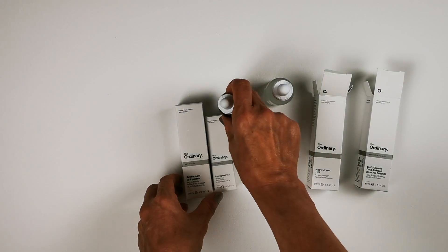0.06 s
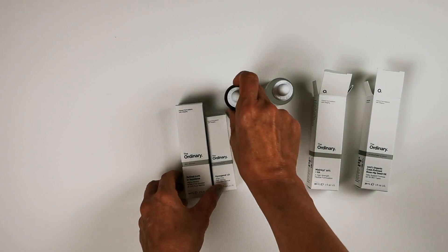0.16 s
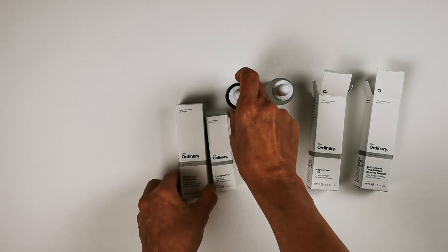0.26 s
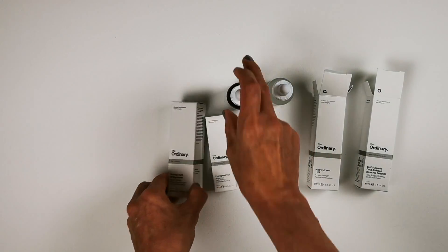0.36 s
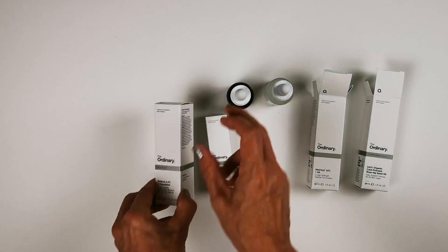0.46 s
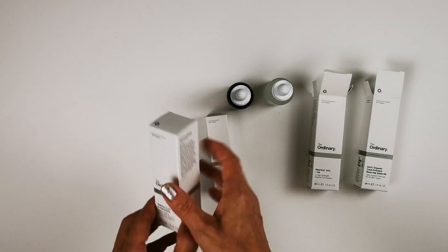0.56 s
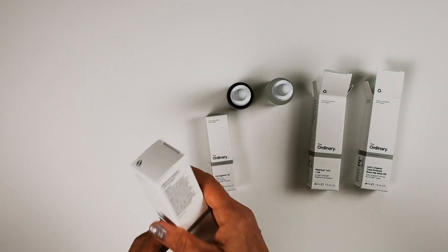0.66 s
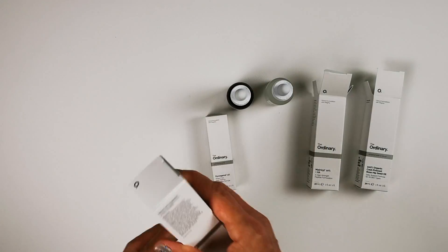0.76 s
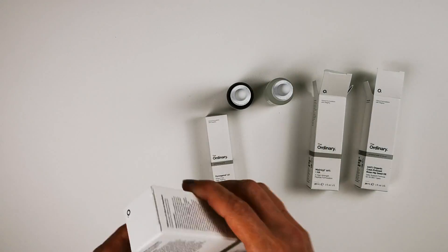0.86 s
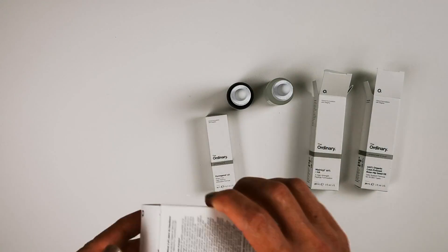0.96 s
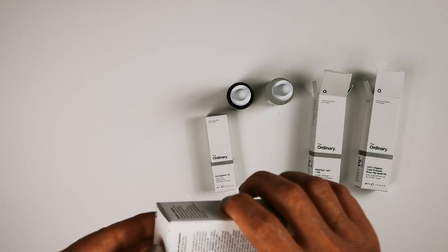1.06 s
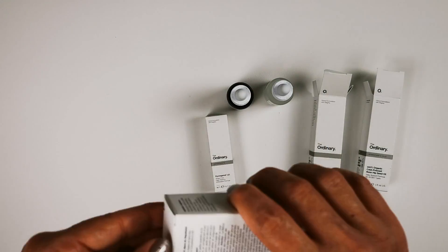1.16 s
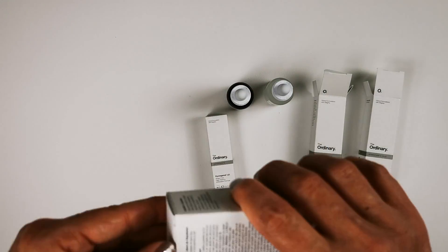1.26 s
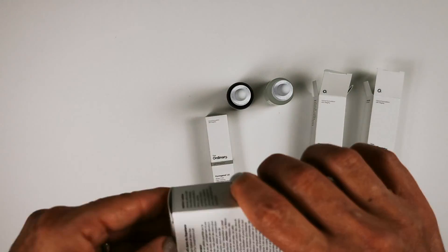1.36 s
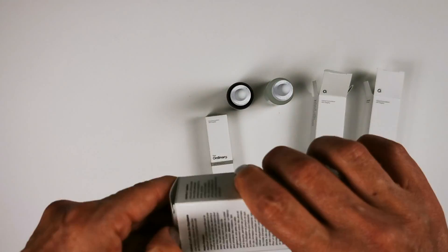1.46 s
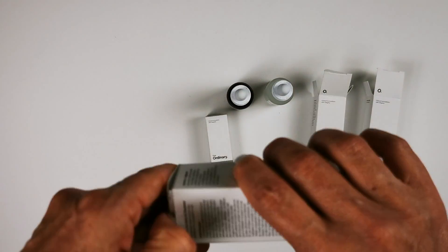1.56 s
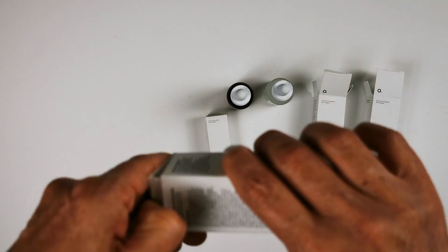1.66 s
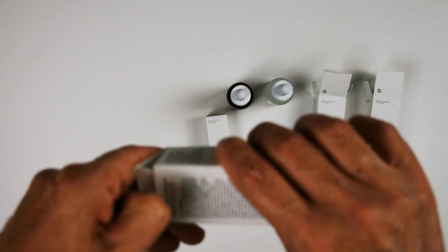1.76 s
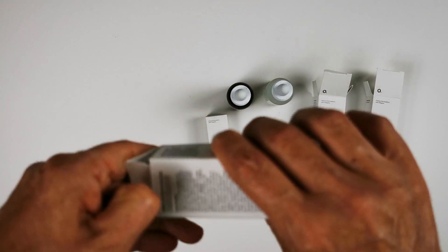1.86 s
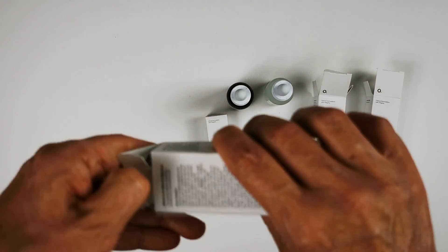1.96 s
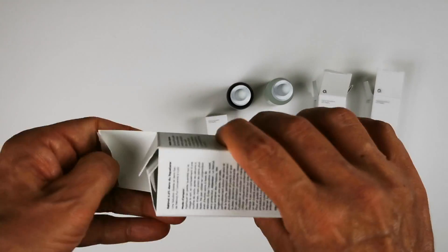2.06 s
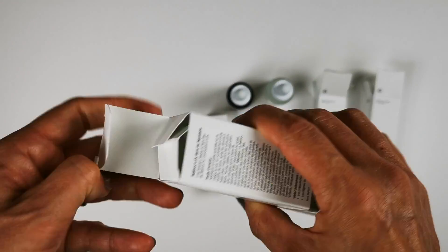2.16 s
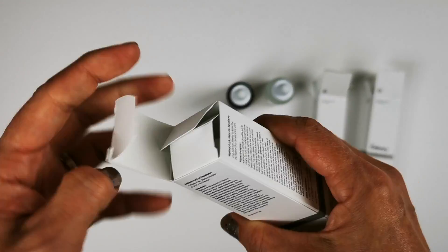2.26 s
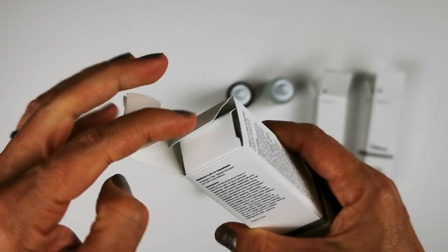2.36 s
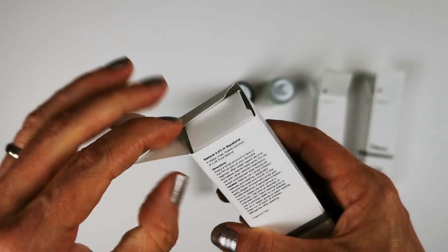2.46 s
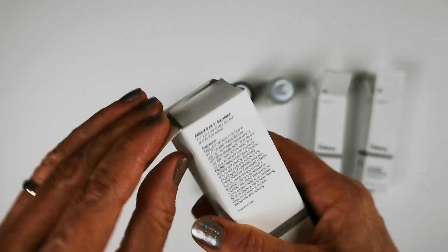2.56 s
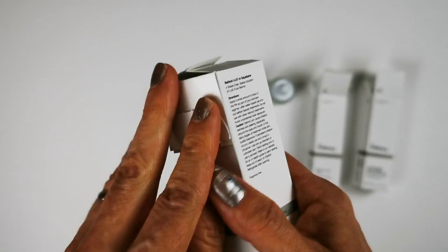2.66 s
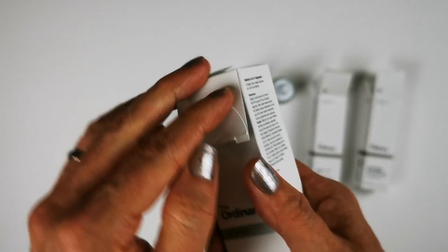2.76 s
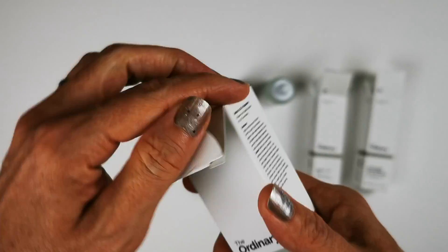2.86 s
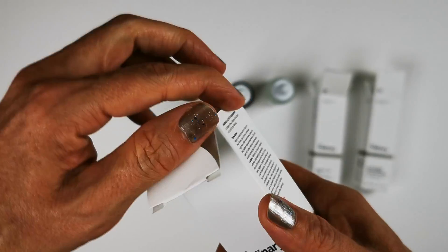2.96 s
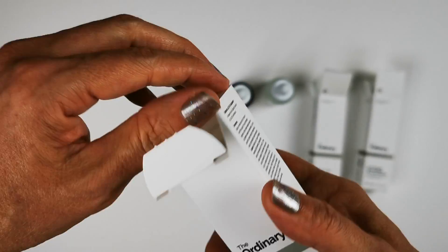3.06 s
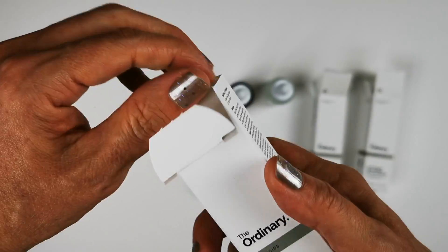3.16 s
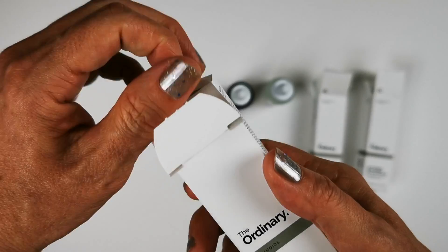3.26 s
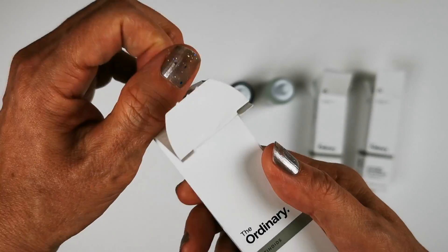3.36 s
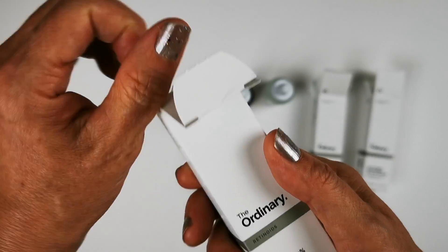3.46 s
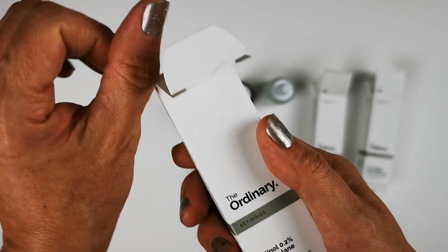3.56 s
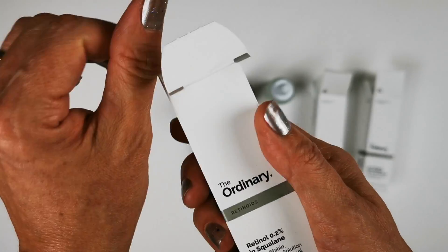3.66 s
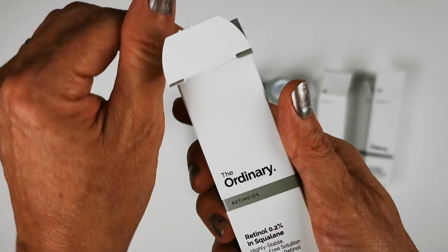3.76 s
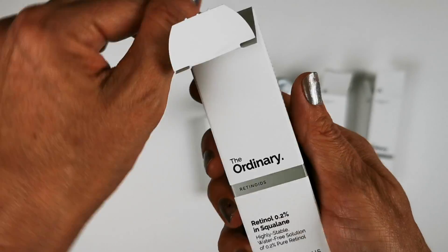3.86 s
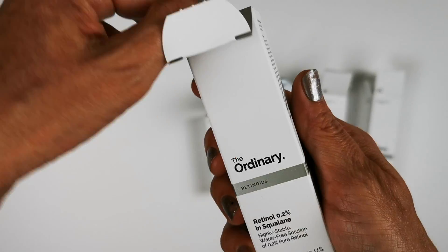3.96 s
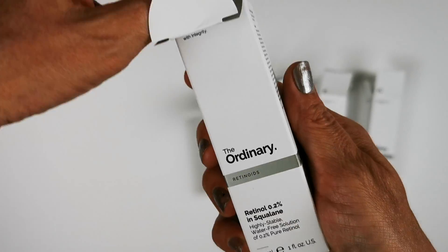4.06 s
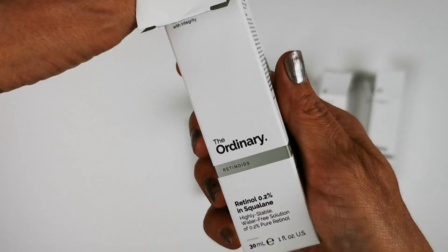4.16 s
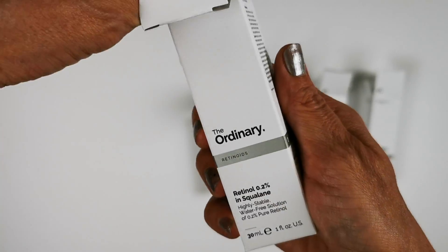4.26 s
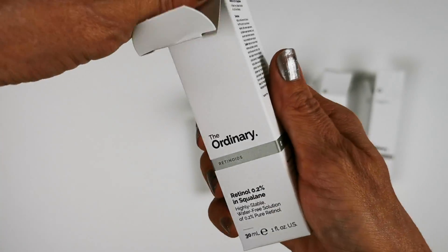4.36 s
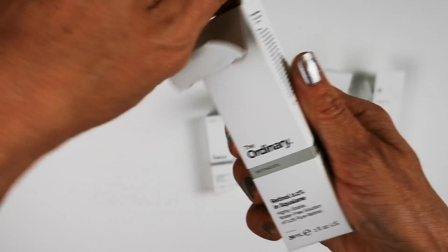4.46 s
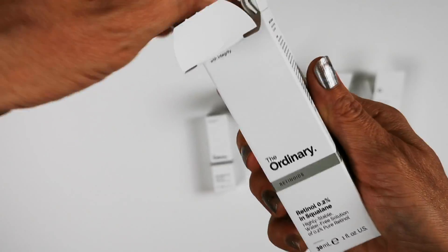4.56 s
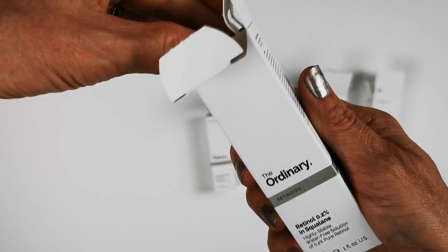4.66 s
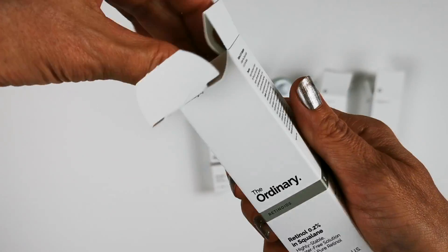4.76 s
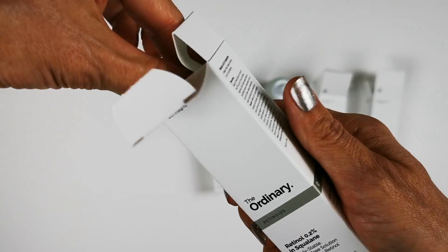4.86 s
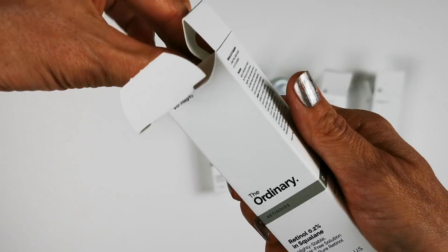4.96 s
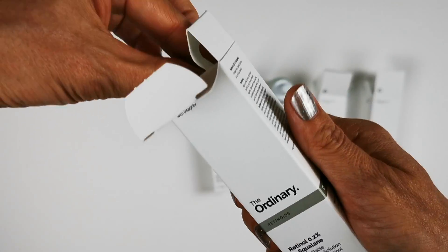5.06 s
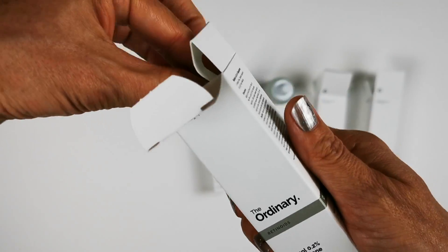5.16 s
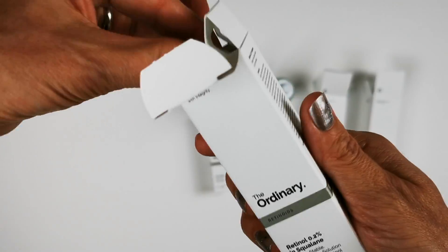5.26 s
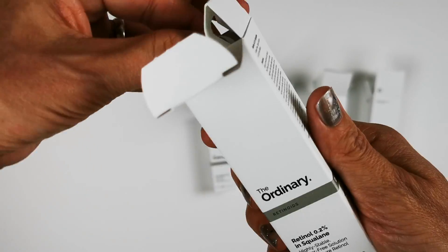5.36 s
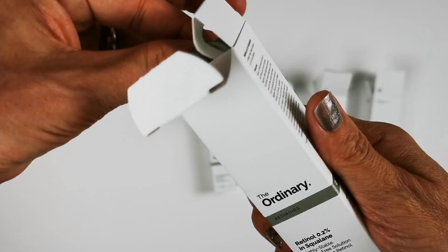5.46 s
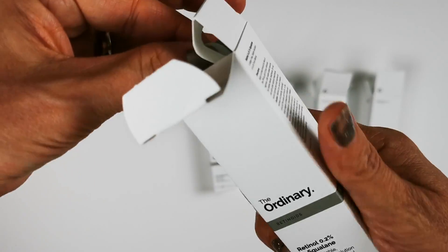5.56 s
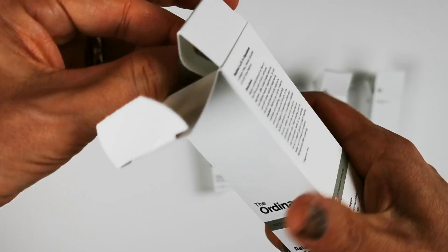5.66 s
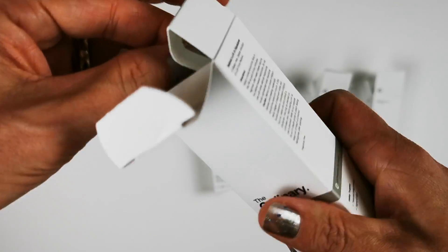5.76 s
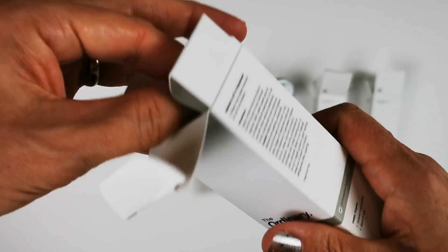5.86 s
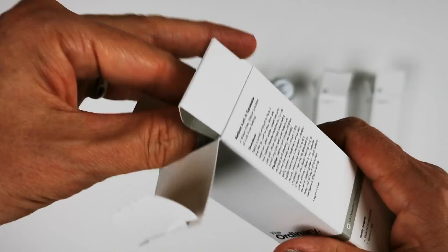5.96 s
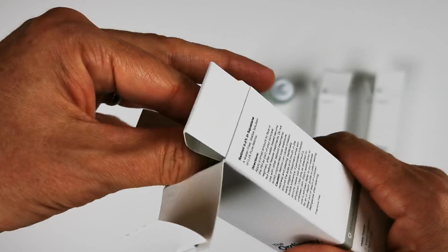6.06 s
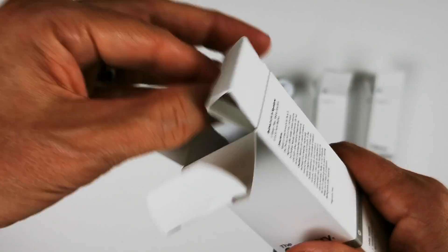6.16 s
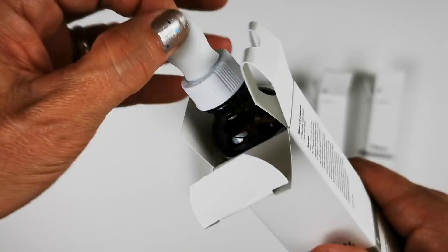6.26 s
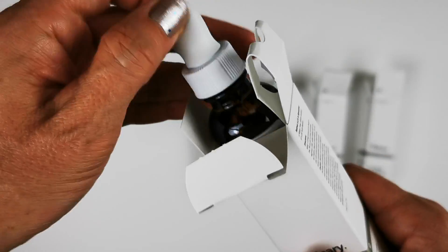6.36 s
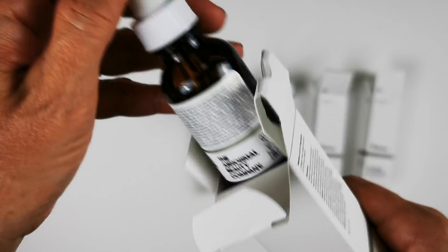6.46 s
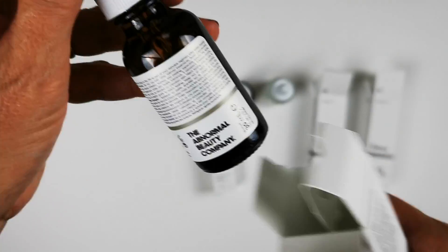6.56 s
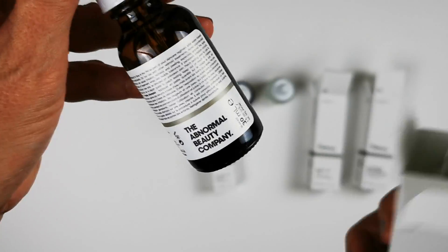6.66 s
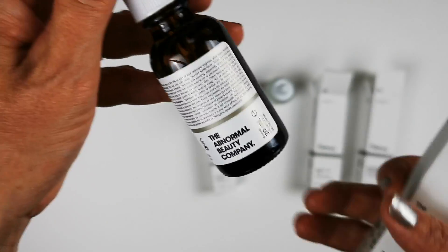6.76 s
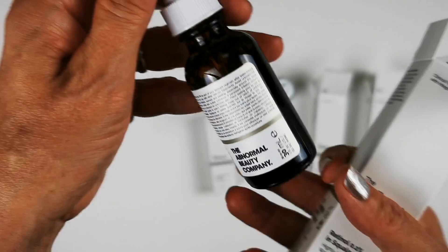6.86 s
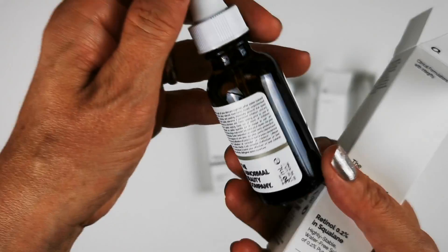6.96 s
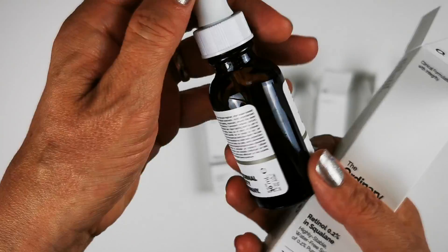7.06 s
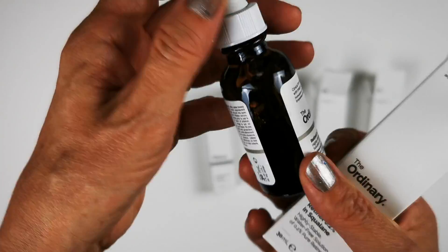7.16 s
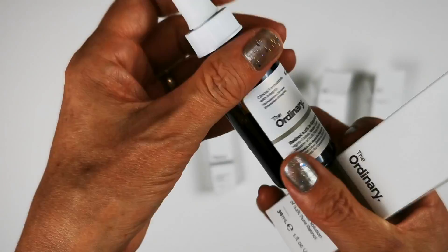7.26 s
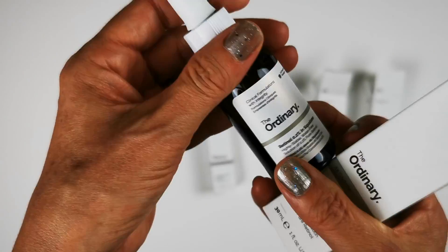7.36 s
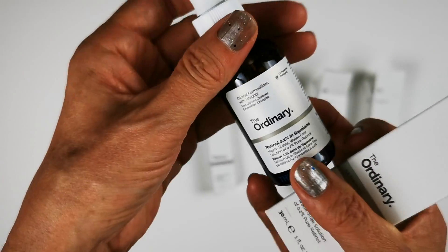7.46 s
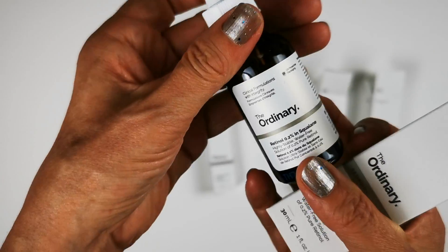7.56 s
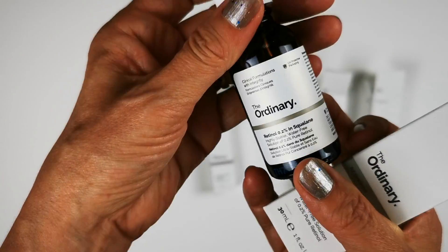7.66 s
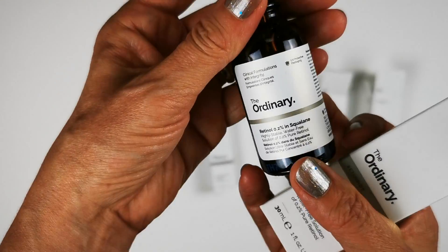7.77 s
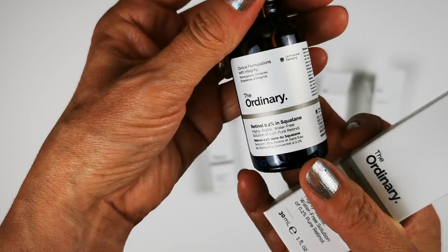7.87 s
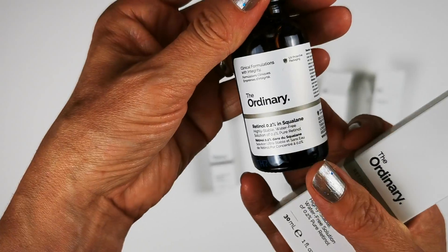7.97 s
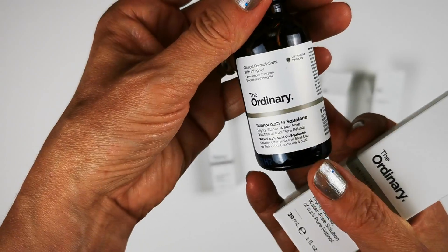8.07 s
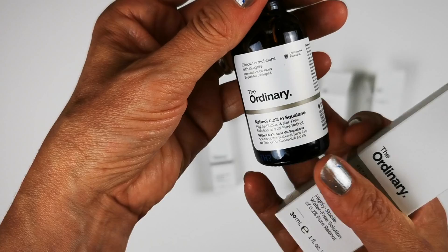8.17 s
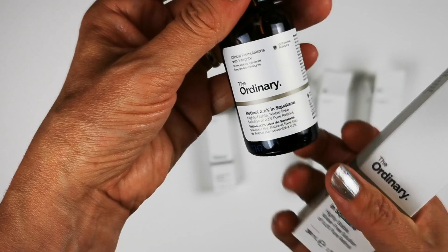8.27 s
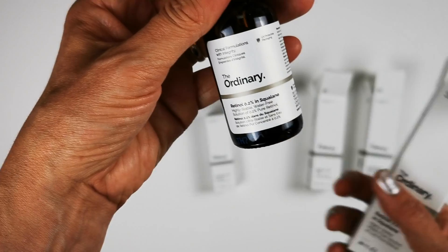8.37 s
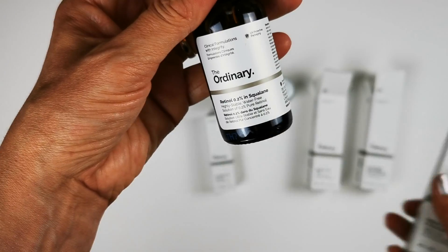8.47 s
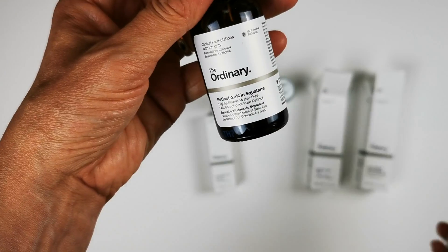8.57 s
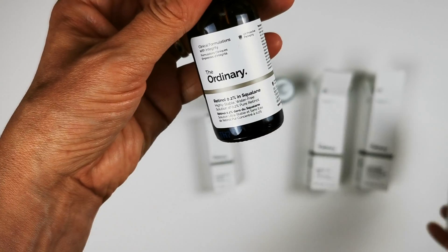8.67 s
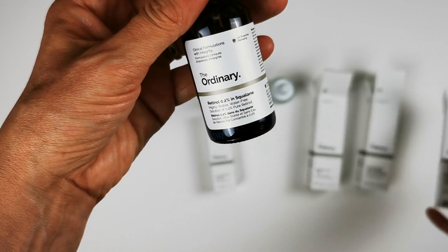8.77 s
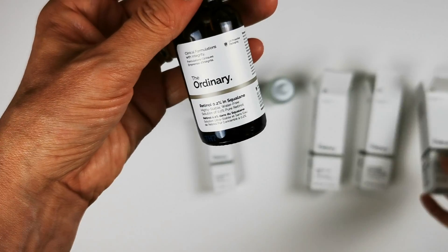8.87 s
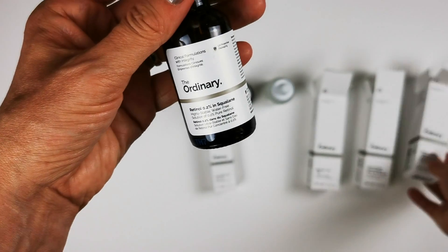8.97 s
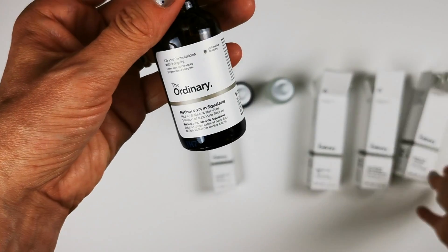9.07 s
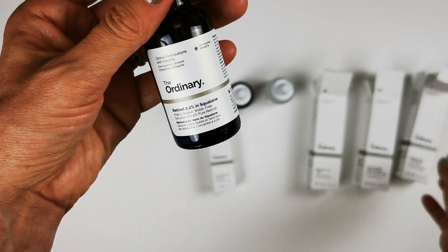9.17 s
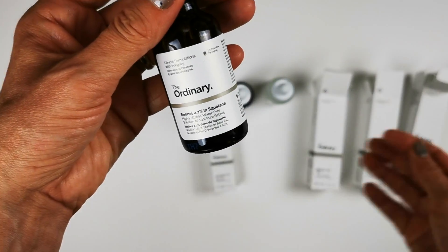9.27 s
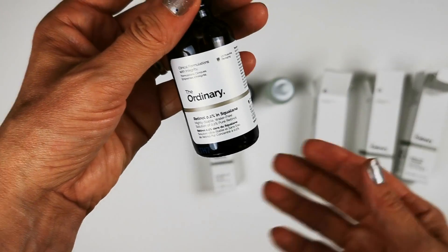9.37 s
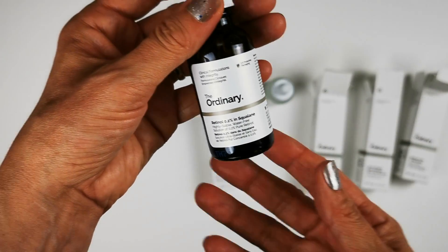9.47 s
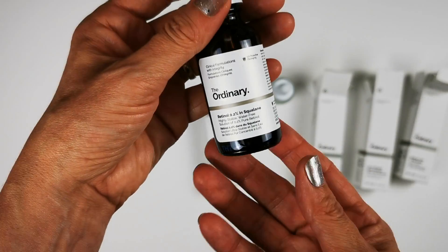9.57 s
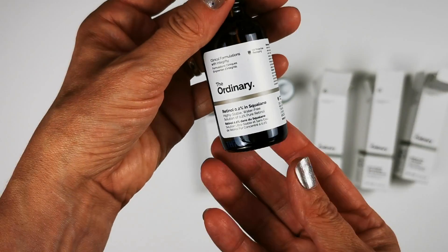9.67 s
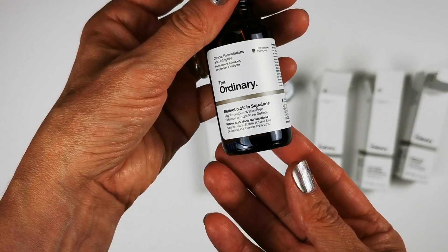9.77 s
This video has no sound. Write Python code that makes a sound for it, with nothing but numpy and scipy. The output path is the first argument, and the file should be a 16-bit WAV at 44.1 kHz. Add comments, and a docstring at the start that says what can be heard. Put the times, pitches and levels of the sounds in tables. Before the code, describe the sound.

Hands open a small paperboard box near the microphone: light table knocks, crisp flap snaps, papery rubbing, a bottle sliding out, then the box laid down.

```python
"""At a table in a small dry room, a stereo microphone close to the hands: first glass and box knock on the table.
Then a thin paperboard carton is opened and a small glass bottle pulled out: fingers and flaps rub the board,
folds snap and nails tap it, with a busy, loud stretch around six seconds; slips set the walls ringing and hissing.
At about nine seconds the box is laid down, with loud board snaps and two last knocks on the table top.
Short room echoes follow the hands; a faint wavering hum and microphone hiss lie below throughout."""
import sys
import numpy as np
from scipy import signal
from scipy.fft import rfft, irfft, next_fast_len
from scipy.io import wavfile
from scipy.ndimage import map_coordinates

SR = 44100
rng = np.random.default_rng(int(sys.argv[2]) if len(sys.argv) > 2 else 0)


def inscribe(sig):
    """Save sig as 16-bit PCM at rate SR to the path in sys.argv[1].

    A 1-D sig is mono; a 2-D sig holds one channel per row.
    Samples are clipped to [-1, 1] before scaling.
    """
    pcm = np.round(np.clip(np.atleast_2d(sig).T, -1, 1) * 32767)
    wavfile.write(sys.argv[1], SR, pcm.astype(np.int16))


N = 432621

# resonances of carton walls and air, for rubs and snaps: f/Hz, width/Hz, level/dB
BOARD_MODES = [(575, 110, -8), (797, 270, 4), (883, 108, -1), (1078, 150, -2), (1210, 93, 0),
               (1400, 450, 4), (1600, 66, -5.5), (1830, 180, -3), (1947, 180, 2.5), (2257, 340, 7),
               (2570, 150, -2.5), (2870, 310, -2.5)]
# spectrum of skin hiss and board cracks: f/Hz, level/dB [dB per Hz]
HISS_SPECTRUM = [(1470, -38), (2500, 1.5), (3440, -5.5), (4480, -4), (5500, -7.5), (6350, -6), (7300, -4),
                 (9730, -5.5), (12700, -5), (16000, -16)]
CRACKLE_PER_S, CRACKLE_SHARE = 90., .3  # coarse fibres giving way under a stroke


def rubbing():
    """Slips of skin and flap set the walls ringing; finer slips make the hiss."""
    board_gain, skin_gain, main_hz, hiss_hz = strokes()
    board = board_gain * (0.46 * rubbed_walls(main_hz) + 0.43 * singing_panel(main_hz)) * stutter(2.7)

    fibres = grains(CRACKLE_PER_S, 5.3)
    walls_crackle = crackle(fibres, main_hz)
    board = board + board_gain * 0.46 * walls_crackle * stutter(2.7)

    # each fibre lifts the hiss for a moment
    ticks = signal.lfilter([1], [1, -np.exp(-1 / (.0012 * SR))], np.abs(fibres))
    lift = .85 + CRACKLE_SHARE * rms_one(ticks)
    # skin catching on the coating
    squeak = gliding([grains(3000.0, 3.5) for part in "xy"], hiss_hz, width_hz=900.)
    skin = skin_gain * (skin_hiss(hiss_hz) + .7 * squeak) * stutter(1.8) * lift
    pan_db = hands(np.arange(N) / SR)[0]
    return (board + skin) * sides(pan_db)


def wall_grips(main_hz):
    """Gain of each wall mode around the sliding main ring, and the sum to level them by."""
    grips = [from_db(db + near_mode_db(hz, main_hz, fall_db=5.0)) for hz, width, db in BOARD_MODES]
    return grips, np.sqrt(sum(grip ** 2 for grip in grips))


def rubbed_walls(main_hz):
    """Dense small slips keep every wall mode ringing, each with its own shifting gain."""
    grips, total = wall_grips(main_hz)
    walls = 0
    for grip, (hz, width, db) in zip(grips, BOARD_MODES):
        walls = walls + grip * shifting() * rms_one(ring(grains(700., 3.1), hz, 0.9 * width))
    return walls / total


def crackle(fibres, main_hz):
    """One snapping fibre strikes all wall modes at once."""
    grips, total = wall_grips(main_hz)
    out = 0
    for k, (grip, (hz, width, db)) in enumerate(zip(grips, BOARD_MODES)):
        out = out + grip * rms_one(ring(fibres, hz, 4.5 * width)) * (-1) ** k
    return CRACKLE_SHARE * out / total


def singing_panel(main_hz):
    """The panel under the finger sings at a pitch that slides with the grip."""
    return gliding([grains(1600.0, 3.4) for part in "xy"], main_hz, width_hz=125.)


def skin_hiss(hiss_hz):
    """Fine slips in six bands, strongest near the sliding hiss peak, partly different in each capsule."""
    slips = coloured(np.array([grains(9000., 1.5) for part in range(3)]), HISS_SPECTRUM)
    hiss, total = 0, 0
    for k, low in enumerate(1400 * 1.5 ** np.arange(6)):
        high = 1.5 * low + 1500 * (k == 5)
        sos = signal.butter(2, [low, high], "band", fs=SR, output="sos")
        # alternate signs make neighbouring bands add where they meet
        gain = from_db(near_mode_db(1.198 * low, hiss_hz, fall_db=10.0)) * (-1) ** k
        shared, *own = signal.sosfilt(sos, slips)
        wide = shared + .7 * np.array(own)  # a wide contact differs in each capsule
        hiss = hiss + gain * np.sqrt(shifting()) * stutter(1.1) * wide
        total = total + gain ** 2 * np.mean(shared ** 2)
    return hiss / np.sqrt(total)


def stutter(depth_db):
    """Stick and let go: a level that wavers at random, depth as rms dB."""
    return from_db(depth_db * rms_one(ring(rng.standard_normal(N), 5.4, 42.0)))


GRIP_SHIFT_DB = 4  # rms shift; the hiss bands take half of it


def shifting():
    """A slow random gain: the grip damps now one wall mode, now another."""
    knots = np.arange(0, N + 2000, 2000)
    return from_db(np.interp(np.arange(N), knots, GRIP_SHIFT_DB * rng.standard_normal(len(knots))))


# strokes of finger or flap on the board: t/s of firmest contact, swell by 20 dB/ms, fade by 20 dB/ms,
#   board ring level/dB, skin hiss level/dB, main ring f/Hz, hiss peak f/Hz
RUB_STROKES = [ (0.09, 212, 80.5, -58.5, -82, 837, 4800), (0.225, 30.5, 251, -63, -86.5, 826, 5540),
               (0.392, 25.5, 40, -55, -72, 1263, 6140), (0.415, 62, 79, -72.5, -65.5, 1263, 4930),
               (0.695, 149.5, 32, -64, -75, 863, 6370), (0.712, 12, 38.5, -57.5, -54.5, 1307, 5250),
               (0.761, 42, 398.5, -68, -66.5, 1290, 5687), (1.033, 40, 40, -63.5, -69, 910, 4970),
               (1.105, 70, 45, -59, -59.5, 1274, 5320), (1.191, 199.5, 70.5, -70, -70, 1600, 5320),
               (1.267, 39.5, 30, -54, -65.5, 1181, 4880), (1.452, 300.5, 501.5, -73.5, -83.5, 1400, 6950),
               (1.657, 10.5, 60, -66, -76, 936, 4930), (1.738, 21.5, 80, -53, -52.5, 1727, 7540),
               (1.822, 30, 120.5, -50, -59, 892, 6230), (1.85, 72.5, 45, -50, -62, 1300, 6090),
               (1.97, 80, 150, -46, -56.5, 1450, 5906), (2.073, 25, 92.5, -44.5, -48, 1660, 5566),
               (2.139, 42.5, 132.5, -59.5, -64.5, 1670, 5454), (2.231, 35, 111, -52, -58.5, 1900, 6346),
               (2.42, 120, 349, -60.5, -80, 1294, 5040), (2.644, 200.5, 40, -63, -71.5, 1106, 5780),
               (2.685, 24.5, 118, -51, -56, 1410, 5784), (2.723, 90.5, 43.5, -50.5, -53, 1428, 7326),
               (2.81, 29.5, 201, -61.5, -73.5, 1496, 5790), (2.892, 100, 122, -56.5, -55, 1356, 8225),
               (2.959, 101.5, 90, -63, -60, 1284, 7560), (3.04, 149, 200.5, -69, -73, 1187, 7020),
               (3.112, 26.5, 150, -60, -67, 1193, 6915), (3.139, 18.5, 24, -67.5, -54, 1285, 6953),
               (3.255, 40, 200, -67.5, -69.5, 1488, 4600), (3.312, 46.5, 97.5, -58.5, -59.5, 1813, 6800),
               (3.347, 60, 120, -53, -59.5, 1503, 5163), (3.45, 39, 71, -60, -80, 1400, 5530),
               (3.58, 200, 80, -68, -78.5, 1400, 5185), (3.72, 171, 59, -61, -63, 1750, 6050),
               (3.771, 43.5, 85, -47.5, -54.5, 1810, 7465), (3.944, 119, 299, -56.5, -61, 1182, 7220),
               (4.083, 79, 43.5, -60, -60, 1198, 5887), (4.168, 50, 60, -56, -63.5, 1712, 6300),
               (4.205, 40.5, 60, -62.5, -59, 1492, 6370), (4.304, 19.5, 251, -56, -65.5, 1238, 6310),
               (4.46, 302.5, 198.5, -64, -61, 1160, 6780), (4.565, 130.5, 45.5, -49.5, -50, 1643, 7926),
               (4.63, 26.5, 39.5, -46, -58, 1532, 7250), (4.71, 119, 60.5, -50.5, -56.5, 1284, 6250),
               (4.83, 303, 303, -56, -63, 1520, 6440), (4.9, 99.5, 60.5, -53.5, -60.5, 1575, 5300),
               (5.035, 149.5, 130.5, -72, -86, 1332, 4794), (5.268, 42.5, 120, -50, -55, 2950, 6520),
               (5.298, 61.5, 60, -47, -55, 1570, 5875), (5.359, 93, 102, -65, -67.5, 1600, 6420),
               (5.42, 53.5, 69.5, -63.5, -75, 1716, 6540), (5.47, 60, 80, -67.5, -75, 1900, 4500),
               (5.53, 30, 60.5, -60, -72, 1300, 4200), (5.555, 60, 36, -60.5, -66, 1505, 7128),
               (5.589, 25, 50, -60.5, -70, 1700, 4500), (5.63, 51, 98, -61, -66, 1807, 6496),
               (5.71, 148.5, 130.5, -59, -61, 1900, 5964), (5.816, 35.5, 92, -53, -52.5, 1872, 6950),
               (5.87, 25.5, 23.5, -35.5, -41.5, 1756, 5313), (5.905, 22, 200, -48.5, -60.5, 1903, 5097),
               (6.08, 251.5, 71, -62.5, -59, 1569, 4392), (6.212, 29.5, 73, -55, -52, 1400, 5660),
               (6.24, 22, 51, -32, -34.5, 1936, 5860), (6.291, 50, 100, -50.5, -45.5, 1306, 6350),
               (6.334, 99, 44, -49.5, -50.5, 1144, 6566), (6.399, 23, 198.5, -67, -71.5, 1190, 6460),
               (6.475, 46.5, 171.5, -54.5, -45.5, 1146, 7710), (6.505, 15.5, 89.5, -45, -52.5, 1120, 6475),
               (6.565, 39, 108.5, -41.5, -47, 1165, 6420), (6.62, 124, 112.5, -52.5, -61.5, 1196, 6063),
               (6.7, 104, 36.5, -58, -61.5, 1222, 5450), (6.82, 59, 201, -72, -83, 1260, 5650),
               (7.2, 296.5, 200, -83, -83.5, 1164, 7600), (7.296, 32.5, 59.5, -66.5, -79, 1140, 6970),
               (7.417, 103, 69, -70.5, -85, 1227, 7235), (8.309, 201.5, 198, -73, -90, 1210, 6424),
               (8.404, 68.5, 202.5, -63.5, -68, 1380, 5960), (8.482, 26, 71, -59.5, -69, 1130, 6720),
               (8.635, 40.5, 297.5, -65, -67, 1103, 7290), (8.708, 208, 141.5, -65, -63, 1104, 7595),
               (8.97, 134, 28, -69.5, -69, 1652, 7360), (9.018, 24, 89.5, -40, -52, 1210, 4630),
               (9.125, 30.5, 83, -35, -52.5, 891, 5500), (9.2, 52.5, 117.5, -58.5, -80.5, 938, 6000)]
STROKE_ROUNDNESS = 0.95  # exponent: 1 = even slope in dB, more = fuller top and more sudden ends


def strokes():
    """Each stroke swells to its firmest contact and fades; the loudest weighs most in the pitch of ring and hiss."""
    s, swell, fade, board_db, skin_db, main_hz, hiss_hz = np.transpose(RUB_STROKES)[:, :, None]
    t = np.arange(0, N + 64, 32) / SR
    swell, fade = swell / 1000, fade / 1000  # ms to s
    before, after = (s - t) / np.maximum(swell, 1e-3), (t - s) / np.maximum(fade, 1e-3)
    shape_db = -20 * np.maximum(before, after) ** STROKE_ROUNDNESS
    # powers of all strokes
    board, skin = [from_db(2 * (db + shape_db)) + 1e-30 for db in (board_db, skin_db)]
    ring_hz = (board * main_hz).sum(0) / board.sum(0)
    peak_hz = (skin * hiss_hz).sum(0) / skin.sum(0)
    controls = [np.sqrt(board.sum(0)), np.sqrt(skin.sum(0)), ring_hz, peak_hz]
    return [np.interp(np.arange(N) / SR, t, c) for c in controls]


# where the hands are before the microphone: t/s, left-right level/dB, lag of left/samples
HAND_PLACES = [(0, -4.5, -3), (1.5, -4, -1.5), (2.4, -5, -2.5), (3.799, -4, -2), (5.8, -4, -2),
               (7.8, -4, -5), (8.1, 9, -7), (8.4, -10, 4.5), (9.3, -3.5, 10.5), (9.8, -2, 5)]


def hands(t):
    """Balance and lag of the hands at the given times."""
    s, pan_db, lag = np.transpose(HAND_PLACES)
    return np.interp(t, s, pan_db), np.interp(t, s, lag)


# snaps and taps on the board: t/s, level/dB, main ring f/Hz, crack over snap level/dB,
#   hollow knock over snap level/dB, focus on the main ring/dB per octave
BOARD_SNAPS = [(0.704, -45, 1050, -9.5, 3.5, 5), (1.028, -40.5, 793, -14, -19, 9.5),
               (1.106, -37.5, 1433, -13, -16, 19), (1.255, -40, 720, -24, -7, 21),
               (1.259, -37, 1430, -22, -45, 15), (1.656, -48, 846, -12.5, -26, 15.5),
               (1.701, -49, 1290, -13.5, -9, 21.5), (1.717, -19, 1400, -2, -10.5, 3.5),
               (1.804, -39, 792, -7, -36, 14.5), (1.952, -46.5, 1270, -35, -30, 27.5),
               (1.963, -30.5, 1186, -29.5, -46, 31), (2.042, -35, 1787, 3, -18, 4.5),
               (2.052, -11.5, 1600, -2, -19, 24), (2.058, -19.5, 1684, -23, -8.5, 2.5),
               (2.231, -36.5, 1830, 11.5, -7, 6), (2.32, -41, 2340, -4, -25, 16),
               (2.444, -54, 1900, -2, -30, 8), (2.584, -42, 1210, -6, -22, 12.0),
               (2.63, -45.5, 937, 2, -20, 18), (2.674, -47.5, 968, 9, -28, -5),
               (2.726, -50, 1394, 6, -1, 22.5), (2.799, -50.5, 1600, 8, -22, 20),
               (3.107, -62, 1201, 6, -21, 20), (3.138, -48, 1167, 15, -21, 27),
               (3.316, -56, 1998, -1, -30, 8), (3.345, -59, 1500, -3, -28, 8),
               (3.77, -36, 1486, -17, -20, 8), (3.982, -45.5, 1298, -2, -22, 4),
               (4.06, -46, 2000, -3, -30, 6), (3.75, -40.5, 1810, 0, -26, 3.5),
               (4.089, -40.5, 894, -13, -20, 4.5), (4.166, -31.5, 1334, -10, -29, 13),
               (4.294, -41, 1210, -20, -41.5, 34), (4.373, -37.5, 982, -25.5, -30.5, 18.5),
               (4.475, -44, 800, -10, -30, 12), (4.536, -38, 600, -18, -3, 18),
               (4.572, -39, 2300, 0, -30, 14), (4.619, -41, 2800, -2, -30, 20),
               (4.63, -34, 1500, -6, -20, 8), (4.688, -41, 1220, -10, -20, 12.0),
               (4.717, -30, 760, -6, -18, 6), (4.873, -42, 1570, -11, -20, 25),
               (4.898, -35, 1550, -10, -20, 10), (5.241, -55, 2015, -14, -33, 12),
               (5.265, -42, 3007, -6, -31, 22), (5.276, -37.5, 1700, -18.5, -35, 12),
               (5.287, -41, 1463, -14, -25, 6), (5.301, -34, 1503, -11, -30, 19),
               (5.32, -28.5, 1570, -5, -44, 25), (5.359, -43.5, 1210, 6.5, -32, 29),
               (5.387, -46, 1490, 0, -32, 20), (5.409, -45.5, 3000, -10, -29, 4),
               (5.552, -52, 1500, 4, -30, 18), (5.624, -52, 1780, -6, -28, 6),
               (5.793, -44, 2000, -26, -24, 5), (5.814, -40, 1892, 4, -30, 15),
               (5.856, -31, 1395, 1, -9.5, 14), (5.868, -28.5, 1170, -24, -43, 13),
               (5.894, -21.5, 1970, -22, -17, 19.5), (5.924, -48, 2364, 6, -40, 20),
               (5.98, -56, 895, -18.5, 9.5, 21), (6.071, -49.5, 1800, -0.5, 3.5, -3),
               (6.211, -47, 1900, 11, -30, 13), (6.233, -18, 1960, -40, -40, 21),
               (6.247, -25.5, 1600, -10.5, -28, 26), (6.243, -19.5, 2120, -15, -28, 29.5),
               (6.285, -31.5, 2690, 13, -8.5, -7.5), (6.289, -23.5, 910, -5, -3, 63),
               (6.398, -43, 1210, -25, -41.5, 13), (6.455, -44, 2600, 7, -30, 13),
               (6.493, -28, 1105, -23, -40, 37), (6.558, -26.5, 1078, -18.5, -7.5, 19),
               (6.564, -20.5, 1210, -36, -14, 11), (6.578, -27, 1150, -24, -4, 26),
               (6.585, -39, 1130, -20.5, -12.5, 12), (6.605, -30, 1160, 3.5, -17, 23),
               (6.632, -27, 1160, -12, -20, 20), (6.888, -38, 1208, -23, -13.5, 15),
               (6.933, -35.5, 1153, -31, -23, 35), (7.103, -36, 1140, -22, -14.5, 28),
               (7.3, -45.5, 1184, -25.5, -25, 36), (7.409, -48, 1240, -31, -28, 29),
               (7.456, -46.5, 1148, -18.5, -18, 7), (7.465, -35, 1120, -19.5, -22, 12.5),
               (8.254, -54, 1196, -21, -40, 31), (8.302, -38.5, 1210, -25.5, -39, 31),
               (8.483, -38, 1052, -25, -12.5, 37), (8.989, -21.5, 891.6, -12.5, -8.5, 1.5),
               (9.003, -29.5, 1000, -1, -5.5, -5), (9.108, -15.5, 796, -6.5, -6.5, 2.5)]
# low resonances of the hollow box: f/Hz, width/Hz, level/dB
HOLLOW_MODES = [(190, 70, -12), (318, 70, -2), (450, 90, -4), (570, 80, -3)]
SNAP_S = 0.00313  # time a fold takes to give way
SNAP_PAN_DB, SNAP_SCATTER_DB = -3.5, 2  # folds lie right of the fingers, a little apart from each other
CRACK_FOCUS = 1.1  # pitched part at the hiss peak, against the plain crack noise at 1
MODE_SCATTER_DB = 2  # each blow, on board or table, strikes the modes a little differently


def snaps():
    """A fold gives way in a few slips; they strike the wall modes, crack briefly and knock the hollow box."""
    s, peak_db, main_hz, crack_db, knock_db, focus_db = np.transpose(BOARD_SNAPS)
    chance = rng.standard_normal((len(s), len(BOARD_MODES) + len(HOLLOW_MODES) + 1))
    pan_db = hands(s)[0] + SNAP_PAN_DB + SNAP_SCATTER_DB * chance[:, len(BOARD_MODES)]
    height = from_db(peak_db) * sides(pan_db)

    late, size = rng.random((2, len(s), 5))
    late[:, 0], size[:, 0] = 0, 2.4  # the first slip leads
    at = (s[:, None] + late * SNAP_S).ravel()
    sign = rng.choice([-1, 1], size.shape)

    def slips(heights, factor):
        """The five slips of every snap as clicks."""
        return clicks(at, (heights[..., None] * size * factor).reshape(2, -1))

    out = 0
    for k, (hz, width, db) in enumerate(BOARD_MODES):
        focus = near_mode_db(hz, main_hz, fall_db=focus_db)
        strength = from_db(db - 14 + focus + MODE_SCATTER_DB * chance[:, k])
        out = out + ring(slips(height * strength, sign * (-1) ** k), hz, width)

    low_height = from_db(peak_db + knock_db) * sides(.5 * pan_db)  # long waves reach both capsules more alike
    for k, (hz, width, db) in enumerate(HOLLOW_MODES):
        strength = from_db(db - 5 + MODE_SCATTER_DB * chance[:, -1 - k]) * (-1) ** k
        out = out + ring(clicks(s, low_height * strength), hz, width)

    burst = slips(height * from_db(crack_db - 16.0), 0.46) + 1e-18
    return out + cracks(burst)


def cracks(burst):
    """Each slip lets out a burst of noise that dies first fast, then slower."""
    shared, *own = coloured(np.array([grains(12000.0, 0.72) for part in range(3)]), HISS_SPECTRUM)
    sharp, lasting = np.exp(-1 / (0.0021 * SR)), np.exp(-1 / (0.011 * SR))
    dying = signal.lfilter([1], [1, -sharp], burst) + 0.55 * signal.lfilter([1], [1, -lasting], burst)
    pitched = gliding([grains(13000.0, 0.8) for part in "xy"], strokes()[3], width_hz=1500.)
    noise = rms_one(shared + 1.2 * np.array(own))
    return dying * rms_one(noise + CRACK_FOCUS * pitched)


# bottle and box knocking on the table: t/s, level/dB, click over knock level/dB
TABLE_KNOCKS = [(0.014, -58, 21), (0.043, -29, -1), (0.064, -44, -15), (0.145, -49, -21), (0.194, -47, -52),
                (0.206, -39.5, -23), (0.215, -38.5, -30), (0.228, -53, -28), (0.244, -42.5, -28),
                (0.261, -72, -27), (0.3, -75, 2), (0.379, -30.5, -29.5), (0.415, -61, -25),
                (8.988, -54.5, 24), (9.11, -38.5, 6)]
# resonances of the table top: f/Hz, level/dB, t60/s
TABLE_MODES = [(120, 1, 0.14), (150, -4, .12), (192, 8, 0.04), (255.7, -7, 0.14), (317, -11, 0.18),
               (404, -7, 0.08), (507, -7, 0.06), (635, -8, 0.05), (855, -16, 0.05)]
THUMP_HZ, THUMP_WIDTH_HZ, THUMP_GAIN = 233, 51, 0.76  # first push of the top under a knock
ROCKING_DB, ROCKING_S = -30, 0.11  # the bottle rocks on after each knock: level, decay time constant


def knocks():
    """Each knock thumps the table top and ticks on its hard skin."""
    s, peak_db, click_db = np.transpose(TABLE_KNOCKS)
    chance = rng.standard_normal((len(s), len(TABLE_MODES)))
    after_knock = clicks(s, from_db(peak_db + ROCKING_DB))
    rocking = signal.lfilter([1], [1, -np.exp(-1 / (ROCKING_S * SR))], after_knock)
    rocking = rocking * grains(150., 0.89)
    out = 0
    for k, (hz, db, t60) in enumerate(TABLE_MODES):
        blow = clicks(s, from_db(peak_db - 8 + MODE_SCATTER_DB * chance[:, k]))
        width_hz = np.log(1000) / np.pi / t60
        out = out + ring(from_db(db) * (rocking - blow) * (-1) ** k, hz, width_hz)
    out = out - THUMP_GAIN * ring(clicks(s, from_db(peak_db)), THUMP_HZ, THUMP_WIDTH_HZ)
    tick = clicks(s, from_db(peak_db + click_db - 4.5))
    out = out + ring(tick, 645, 120) - 0.52 * ring(tick, 1350, 270) + 0.34 * ring(tick, 2300, 500)
    return out * sides(0.6)[:, None]


ROOM_T60_S, ROOM_DB = 0.21, -15.5  # decay of the lows, level of the echoes
WALL_CUT_HZ = 6500


def room(x):
    """Eight feedback delays a side, duller on every round."""
    size = next_fast_len(N + SR)
    turn = np.exp(-2j * np.pi * np.arange(size // 2 + 1) / size)  # delay by one sample
    dull = np.exp(-2 * np.pi * WALL_CUT_HZ / SR)
    lowpass = (1 - dull) / (1 - dull * turn)
    reply = np.zeros((2, len(turn)), complex)
    for k, lag in enumerate((rng.uniform(.005, .03, 16) * SR).astype(int)):
        loop = from_db(-60 * lag / SR / ROOM_T60_S) * lowpass * turn ** lag
        reply[k % 2] += loop / (1 - loop) * (-1) ** (k // 2)
    return irfft(reply * rfft(x, size), size)[:, :N]


# spectrum of rumble and microphone hiss: f/Hz, level/dB [dB per Hz]
FLOOR_SPECTRUM = [(12, -30), (20, -9), (30, -3.5), (50, -5), (65, -6), (78, -8), (130, -17), (300, -19.5),
                  (600, -22), (1000, -25.5), (3000, -27.5), (7000, -36), (9800, -36.5), (10600, -32),
                  (16000, -37)]
# how alike the two capsules hear it: f/Hz, likeness [0 to 1]
CAPSULE_LIKENESS = [(25, .9), (70, 0.2), (130, 0.17), (290, 0.37), (1400, 0.062), (4000, .01)]
# balance of the two capsules: f/Hz, left-right level/dB
CAPSULE_BALANCE = [(60, 1.5), (180, -4), (550, -14), (1650, -3.5), (4970, -0.5), (15000, -9)]
FLOOR_DB, HUM_DB = -70, -75  # rms
HUM_HZ, HUM_WAVER_HZ = 90, 9  # middle pitch, rms waver


def floor():
    """Rumble shared by both sides, hiss of each capsule, a wavering hum."""
    hz = np.maximum(np.fft.rfftfreq(N, 1 / SR), 1)
    alike = np.clip(at_hz(CAPSULE_LIKENESS, hz), 0, 1)
    mid, side = rfft(rng.standard_normal((2, N)))
    pair = np.sqrt(1 + alike) * mid + np.sqrt(1 - alike) * side * [[1], [-1]]
    pair = pair * sides(at_hz(CAPSULE_BALANCE, hz))
    noise = rms_one(coloured(irfft(pair, N), FLOOR_SPECTRUM))
    waver = HUM_WAVER_HZ * rms_one(ring(rng.standard_normal(N), 7., 10.))
    hum = rms_one(np.sin(2 * np.pi * np.cumsum(HUM_HZ + waver) / SR))
    return from_db(FLOOR_DB) * noise + from_db(HUM_DB) * hum


def from_db(db):
    """Decibels to gain."""
    return 10 ** (np.asarray(db) / 20)


def rms_one(x):
    """Scaled to rms 1."""
    return x / np.sqrt(np.mean(x ** 2) + 1e-20)


def at_hz(points, hz):
    """Reads a table on a log-frequency axis."""
    return np.interp(np.log(hz), np.log(np.array(points)[:, 0]), np.array(points)[:, 1])


def sides(pan_db):
    """Left and right gains."""
    return from_db(np.array([pan_db, -pan_db]) / 2)


def near_mode_db(hz, main_hz, fall_db):
    """Modes far in pitch from the main one speak less, by fall_db an octave."""
    return -fall_db * np.abs(np.log2(hz / main_hz))


def ring(x, hz, width_hz):
    """A unit click sets a decaying sine of starting height 1 ringing."""
    r, w = np.exp(-np.pi * width_hz / SR), 2 * np.pi * hz / SR
    return signal.lfilter([0, np.sin(w)], [1, -2 * r * np.cos(w), r * r], x + 1e-18)


def gliding(slips, hz, width_hz):
    """Two slip trains sound through one resonance whose pitch slides."""
    turn, hold = 2 * np.pi * np.cumsum(hz) / SR, np.exp(-np.pi * width_hz / SR)
    sway = signal.lfilter([1], [1, -hold], slips)
    return rms_one(sway[0] * np.cos(turn) + sway[1] * np.sin(turn))


def clicks(times, heights):
    """Click train; heights may have a row per channel."""
    out = np.zeros(np.shape(heights)[:-1] + (N,))
    out[..., np.round(times * SR).astype(int)] = heights
    return out


def grains(per_s, spread_db):
    """Random slips of uneven size."""
    size = from_db(spread_db * np.minimum(rng.exponential(1, N), 5)) * rng.choice([-1, 1], N)
    return size * (rng.random(N) < per_s / SR)


def coloured(x, spectrum):
    """Shapes the spectrum of a noise."""
    hz = np.maximum(np.fft.rfftfreq(N, 1 / SR), 1)
    return irfft(rfft(x) * from_db(at_hz(spectrum, hz)), N)


def highpass(x, hz):
    """Second-order low cut."""
    return signal.sosfilt(signal.butter(2, hz, "high", fs=SR, output="sos"), x)


def scene():
    """Near sounds reach the two capsules a few samples apart; small things radiate no deep bass."""
    carton = highpass(rubbing() + snaps(), 184)  # the thin walls radiate little below this
    near = highpass(carton + knocks(), 90.)
    n = np.arange(N)
    lag = hands(n / SR)[1]
    left = map_coordinates(near[0], [n - lag], order=3)
    mid, side = np.array([[.5, 0.41], [.5, -0.53]]) @ room(near)
    side = highpass(side, 350.)  # low echoes arrive alike
    echoes = from_db(ROOM_DB) * np.array([mid + side, mid - side])
    return np.array([left, near[1]]) + echoes + floor()


def record(dry):
    """The top is cut steeply: 50 dB down from 16250 Hz."""
    return signal.sosfilt(signal.cheby2(18, 50, 16250, fs=SR, output="sos"), dry)


dry = scene()
out = record(dry)
inscribe(out)
```